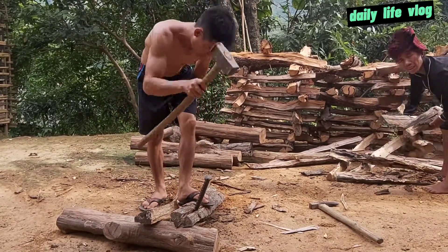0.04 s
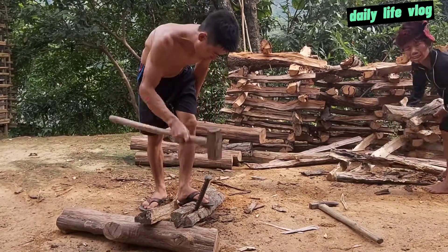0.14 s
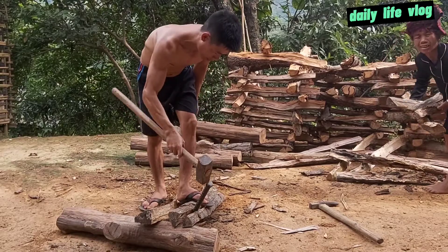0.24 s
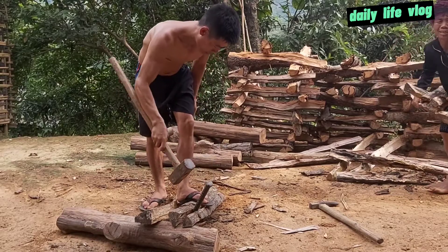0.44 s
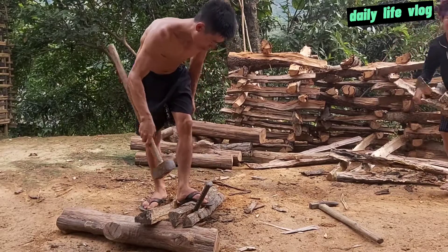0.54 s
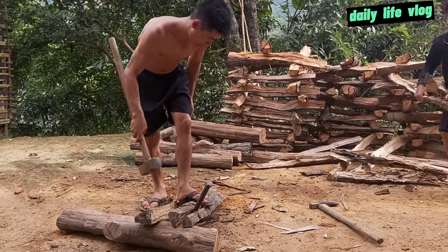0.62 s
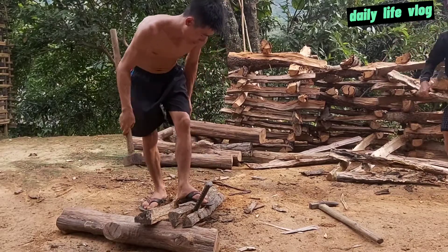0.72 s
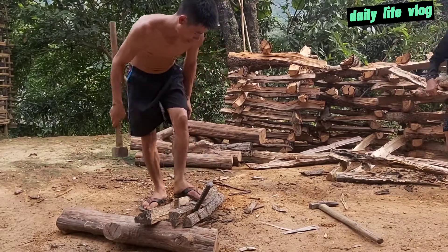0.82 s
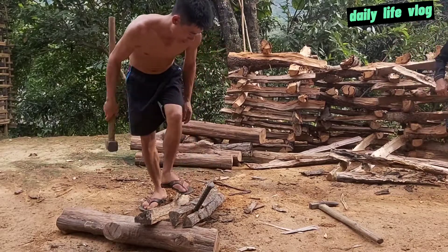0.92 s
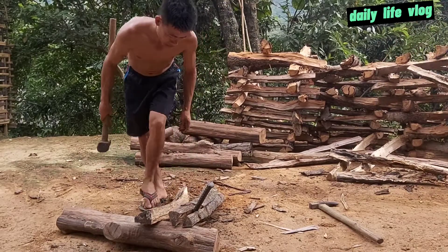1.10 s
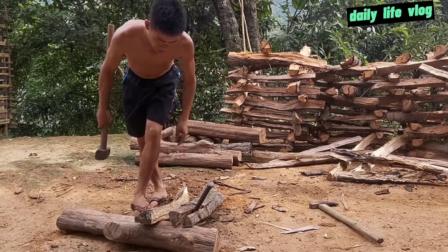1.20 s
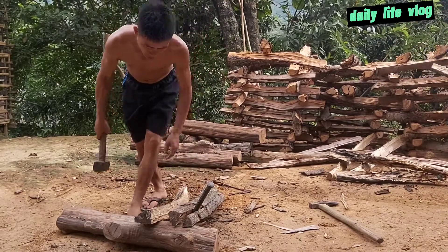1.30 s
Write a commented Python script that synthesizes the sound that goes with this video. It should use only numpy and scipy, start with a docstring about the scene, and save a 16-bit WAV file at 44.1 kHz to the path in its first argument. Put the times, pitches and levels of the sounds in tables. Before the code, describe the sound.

One loud metallic clang with a woody crack comes from the right as a sledgehammer meets a wedge. It dies away quickly, leaving small ticks, a faint sandal scuff and light wind on the microphone in a quiet yard.

```python
"""A sledgehammer hits a steel wedge in a log, once, in a quiet yard beside a woodpile.
The impact excites the modes of the steel, which clang and beat, and the damped modes of the log,
which knocks and cracks; the stacked wood scatters the blow into a dense, short tail. Loose wood
settles, chips tick and a sandal scuffs over faint leaves and far tones. Nearly all of it reaches
the right channel; a light wind rumbles on the left port."""
import sys
import numpy as np
from scipy import signal
from scipy.fft import rfft, irfft, next_fast_len
from scipy.io import wavfile

SR = 44100
rng = np.random.default_rng(int(sys.argv[2]) if len(sys.argv) > 2 else 0)


def dump_mix(stems):
    """Bounce the given channels to the path in sys.argv[1] as a 16-bit WAV at rate SR."""
    frames = np.atleast_2d(stems).T  # one column per channel
    limited = np.clip(frames, -1, 1)  # hard clip at full scale
    pcm = np.round(limited * 32767).astype(np.int16)
    wavfile.write(sys.argv[1], SR, pcm)


N = 59535
T = np.arange(N) / SR
BLOW_S = .2305

# spectrum of cracking wood: (frequency [Hz], relative density [dB])
CRACK_SPECTRUM = [(100, -21), (220, -23.5), (330, -5.5), (700, -6.5), (1100, -3.5), (1800, 0), (2600, -1.5),
                  (4700, -0.5), (6000, -5), (8100, 0.5), (9400, -7), (10500, 3.5), (12200, -5),
                  (13000, 0.5), (14800, -9)]


def from_db(db):
    """Amplitude ratio of a level in decibels."""
    return 10 ** (np.asarray(db) / 20)


def rms_one(x):
    """Normalisation to unit mean power."""
    return x / np.sqrt(np.mean(x ** 2) + 1e-20)


def at_hz(points, hz):
    """Interpolation on a logarithmic frequency axis."""
    f, v = np.transpose(points)
    return np.interp(np.log(np.maximum(hz, 1)), np.log(f), v)


def envelope(points):
    """Amplitude envelope through (time [s], level [dB]) rows."""
    return from_db(np.interp(T, *np.transpose(points)))


def colour(x, spectrum):
    """Minimum-phase filtering by (frequency [Hz], gain [dB]) rows: a folded cepstrum makes it causal."""
    size = 2 * next_fast_len(N)
    gain = from_db(at_hz(spectrum, np.fft.rfftfreq(size, 1 / SR)))
    cepstrum = irfft(np.log(gain))
    cepstrum[1:size // 2] *= 2
    cepstrum[size // 2 + 1:] = 0
    return irfft(rfft(x, size) * np.exp(rfft(cepstrum)))[:N]


def noise(spectrum):
    """Spectrally shaped Gaussian noise of unit power."""
    return rms_one(colour(rng.standard_normal(N), spectrum))


def decay(start, t60):
    """Exponential damping: 1 until the start, then falling 60 dB per t60."""
    return np.exp(-np.log(1000) * np.maximum(T - start, 0) / t60)


def burst(spectrum, start, t60):
    """A noise transient with a step onset and exponential decay."""
    return noise(spectrum) * (T > start) * decay(start, t60)


def flutter(rate_hz):
    """Rayleigh fading: echoes of random phase sum to a slow complex gain of unit power."""
    z = rng.standard_normal((2, N + SR // 10))
    z = signal.sosfilt(signal.butter(2, rate_hz, fs=SR, output="sos"), z)[:, -N:]
    return (rms_one(z[0]) + 1j * rms_one(z[1])) / np.sqrt(2)


def wind():
    """Turbulent pressure on the port makes a gusting rumble."""
    # rumble: (frequency [Hz], relative density [dB])
    spectrum = [(20, -16), (40, 2.5), (62, 1.5), (100, 0.5), (140, -10.5), (200, -14.5), (320, -25),
                (500, -40), (1000, -58)]
    # gusts: (time [s], level [dB])
    gusts = [(0, -52), (.3, -50), (.55, -49.5), (.7, -57.5), (.85, -53.5), (1.1, -59), (1.25, -48.5),
             (1.35, -56)]
    return envelope(gusts) * noise(spectrum)


def ambience():
    """Leaves and far surroundings add incoherently to a noise floor."""
    # ambient noise: (frequency [Hz], relative density [dB])
    spectrum = [(40, -9), (200, -6), (330, 13), (520, 3.5), (750, 1), (1100, -2.5), (1900, -3), (2800, 0.5),
                (6000, 1.5), (10000, -2.5), (15000, -10.5)]
    # its slow drift: (time [s], level [dB])
    drift = [(0, -61.5), (.2, -60.5), (.6, -60), (.75, -64.5), (.95, -63.5), (1.35, -62)]
    return envelope(drift) * noise(spectrum)


def far_tones():
    """Random modulation blurs short, distant tones into narrow bands."""
    # faint tones: (time [s], duration [s], frequency [Hz], level [dB])
    tones = [(.975, 0.053, 3200, -65.5), (0.968, 0.063, 1150, -69.5), (1.161, 0.0842, 485, -63),
             (1.207, 0.11, 925, -64)]
    out = 0
    for start, length, hz, db in tones:
        swell = np.sin(np.pi * np.clip((T - start) / length, 0, 1))
        tone = flutter(rate_hz=.019 * hz) * np.exp(2j * np.pi * hz * T)
        out = out + from_db(db) * swell * tone.real
    return out


def woody_tail():
    """A faint woody noise decays exponentially from the very start."""
    # woody colour: (frequency [Hz], relative density [dB])
    spectrum = [(200, -9), (700, 2.5), (1100, -3), (1500, 3.5), (1850, 0.5), (2600, -6.5), (6000, -13.5),
                (15000, -25)]
    return from_db(-59.5) * burst(spectrum, start=0, t60=.7)


def scuff():
    """Friction of a sandal dragged over dry earth gives a soft swell of hiss."""
    # friction noise: (frequency [Hz], relative density [dB])
    spectrum = [(300, 9), (900, 6), (1800, -32.5), (2700, -2.5), (4200, -4), (8000, 0.5), (15000, -1.5)]
    centre_s, width_s = 1.25, .12
    return from_db(-63.5) * np.exp(-((T - centre_s) / width_s) ** 2) * noise(spectrum)


def grit():
    """Tiny impacts of chips and grit underfoot radiate brief, bright transients."""
    # ticks: (time [s], level [dB])
    ticks = [(0.085, -50), (0.111, -52.5), (0.129, -55), (0.544, -52.5), (1.045, -61)]
    pulses = sum(from_db(db) * (T > start) * decay(start, t60=.03) for start, db in ticks)
    return pulses * noise([(300, -19), (2000, -9), (5000, 6), (15000, -3)])


def wood_modes(start, push_s=0):
    """Modal vibration of a struck log: damped sinusoids that decay once the push ends."""
    # the log's modes, by column: (frequency [Hz]), (level [dB]), (60 dB decay time [s])
    pitches = [165, 320, 365, 490, 560, 705, 780, 900]
    levels = [-36.5, -23.5, -34.5, -23, -28, -20.5, -28.5, -29]
    ring_times = [0.096, 0.069, 0.14, 0.11, 0.18, 0.086, .1, 0.093]
    age = np.maximum(T - start, 0)
    return sum(from_db(db) * np.sin(2 * np.pi * hz * age) * decay(start + push_s, t60)
               for hz, db, t60 in zip(pitches, levels, ring_times))


def settling():
    """Loose wood settles: each soft impact excites the wood's modes and a clack of contact noise."""
    # knocks: (time [s], gain [dB])
    knocks = [(.462, -36.5), (.482, -33.5), (.57, -51)]
    clack = [(300, -17), (1800, -10), (5000, 2.5), (12000, -20)]
    return sum(from_db(db) * (wood_modes(start) + from_db(-13.5) * burst(clack, start, t60=.045))
               for start, db in knocks)


def thud():
    """Ground-borne shock carries the low frequencies of the blow."""
    # dull shock: (frequency [Hz], relative density [dB])
    spectrum = [(30, -6), (70, -3), (160, 0.5), (300, -4.5), (700, -26)]
    return from_db(-38.5) * burst(spectrum, BLOW_S, t60=.14)


def ground_bounce(x, delay_s=.0029, reflection=.16):
    """Comb filtering: one reflection off the hard earth interferes with the direct sound."""
    return x + reflection * np.interp(T - delay_s, T, x)


def scattered_crack(rise_s=.012, hold_s=.025):
    """Diffuse scattering by split logs gives a tail that dulls; the trees return a longer, faint one."""
    # reverberation of the woodpile: (frequency [Hz], 60 dB decay time [s])
    decay_times = [(200, .3), (700, .33), (2000, 0.31), (5000, .3), (10000, .26), (15000, 0.11)]
    spectrum, hz = rfft(noise(CRACK_SPECTRUM)), np.fft.rfftfreq(N, 1 / SR)
    woodpile = 0
    for centre, t60 in decay_times:
        band = at_hz([(f, float(f == centre)) for f, _ in decay_times], hz)
        woodpile = woodpile + irfft(spectrum * band, N) * decay(BLOW_S + hold_s, t60)
    lowpass = signal.butter(1, 5000, fs=SR, output="sos")
    trees = signal.sosfilt(lowpass, noise(CRACK_SPECTRUM)) * decay(BLOW_S, t60=.68)
    rise = np.sqrt(np.clip((T - BLOW_S) / rise_s, 0, 1))
    return rise * (from_db(-12.5) * woodpile + from_db(-29.5) * trees)


def splitting_log(push_s=.008):
    """Forced vibration and fracture: the wedge drives the log's modes up and snaps fibres in jerks."""
    # bites of the wedge: (time after the blow [s], relative level [dB])
    jerks = [(.001, -13.5), (.0062, 1.5), (0.0114, -11)]
    push = np.clip((T - BLOW_S) / push_s, 0, 1)
    snaps = sum(from_db(db - 27.5) * burst(CRACK_SPECTRUM, BLOW_S + delay, t60=.02)
                for delay, db in jerks)
    return push * wood_modes(BLOW_S, push_s) + snaps


def first_touch(start=.2251, t60=.22):
    """Light contact of the head just before the blow gives resonant noise, as (left, right)."""
    # contact noise on the left and on the right: (frequency [Hz], relative density [dB])
    left_spectrum = [(250, -0.5), (700, -1.5), (1850, 2.5), (3500, -5.5), (4600, -2.5), (6000, -23),
                     (9000, -24), (11000, -11), (15000, -17)]
    right_spectrum = [(200, -19), (1200, -14.5), (1850, 1), (2600, -14), (3800, -17), (4900, 6),
                      (6200, -12.5), (7500, -2.5), (9000, -24.5), (11000, -13), (15000, -15)]
    right = from_db(-29.5) * burst(right_spectrum, start, t60)
    left = from_db(-38) * burst(left_spectrum, start, t60)
    return left, right


def steel_modes(pitches, levels, lift_db, swell_s, lift_t60, hold_s=.049):
    """Free vibration: modes swell as early echoes gather, then ring out, wavering by interference."""
    # damping of the steel: (frequency [Hz], 60 dB decay time [s])
    ring_times = [(1500, .33), (4500, 0.39), (8000, 0.47), (11000, .27), (15000, .2)]
    age, out = np.maximum(T - BLOW_S, 0), 0
    swell = np.minimum(age / swell_s, 1)
    echo_lift = 1 + (from_db(lift_db) - 1) * decay(BLOW_S + hold_s, lift_t60)
    for hz, db in zip(pitches, levels):
        scattered = from_db(-1.5) * flutter(rate_hz=34)
        tone = (1 + scattered) * np.exp(2j * np.pi * hz * age)
        out = out + from_db(db) * tone.imag * decay(BLOW_S + hold_s, at_hz(ring_times, hz))
    return out * swell * echo_lift


def clang():
    """Impact excites the normal modes of head and wedge; closely spaced ones beat."""
    # the wedge's beating cluster, by column: (frequency [Hz]), (level before the echo lift [dB])
    wedge_hz = [4410, 4455, 4495, 4520, 4548, 4616, 4687, 4790]
    wedge_db = [-34.5, -24, -24.5, -31, -31, -32, -34, -36.5]
    # other modes of head and wedge, by column: (frequency [Hz]), (level before the echo lift [dB])
    other_hz = [1501, 1757, 1823, 3217, 3895, 7240, 7950, 8165, 8800, 10192, 10655, 11512, 12345, 14930]
    other_db = [-42.5, -40, -34.5, -38, -38, -38.5, -42, -33.5, -34.5, -36.5, -30.5, -38, -34.5, -38.5]
    cluster = steel_modes(wedge_hz, wedge_db, lift_db=8.5, swell_s=.03, lift_t60=.15)
    return cluster + steel_modes(other_hz, other_db, lift_db=6.5, swell_s=.01, lift_t60=.06)


def scene():
    """Superposition in two channels: the blow and the yard lean hard right, the wind sits left."""
    # the blow's left channel relative to its right: (frequency [Hz], gain [dB])
    left_response = [(60, 4.5), (170, -3), (380, -27.5), (700, -24), (1800, -30), (4400, -43),
                     (7000, -55.5), (12000, -40.5)]
    other_paths = .22   # share of the left scatter's power that is uncorrelated with the right
    body = clang() + splitting_log()
    scatter = ground_bounce(scattered_crack())
    touch_left, touch_right = first_touch()
    shock = thud()
    scatter_left = np.sqrt(1 - other_paths) * scatter + np.sqrt(other_paths) * scattered_crack()
    blow_left = colour(body + scatter_left, left_response) + touch_left + shock
    blow_right = body + scatter + touch_right + shock
    left = blow_left + from_db(-31) * ambience() + wind()
    right = blow_right + settling() + grit() + scuff() + far_tones() + ambience() + woody_tail()
    return np.array([left, right])


def record(dry, low_hz=38, high_hz=15300, ceiling=1.05):
    """Band limiting and soft saturation: the deepest rumble is cut, peaks are rounded, the top is cut."""
    x = signal.sosfilt(signal.butter(3, low_hz, "high", fs=SR, output="sos"), dry)
    rounded = ceiling * np.tanh(x / ceiling)
    return signal.sosfilt(signal.ellip(10, .2, 80, high_hz, fs=SR, output="sos"), rounded)


dry = scene()
out = record(dry)
dump_mix(out)
```